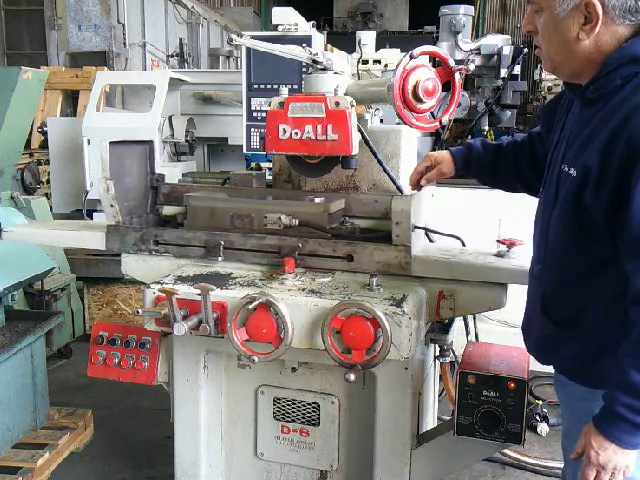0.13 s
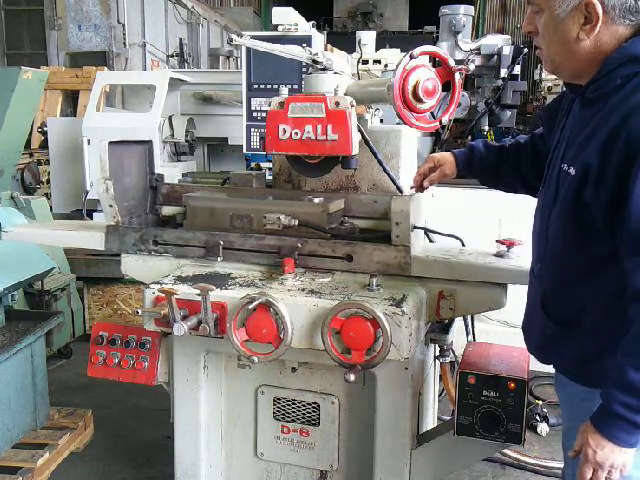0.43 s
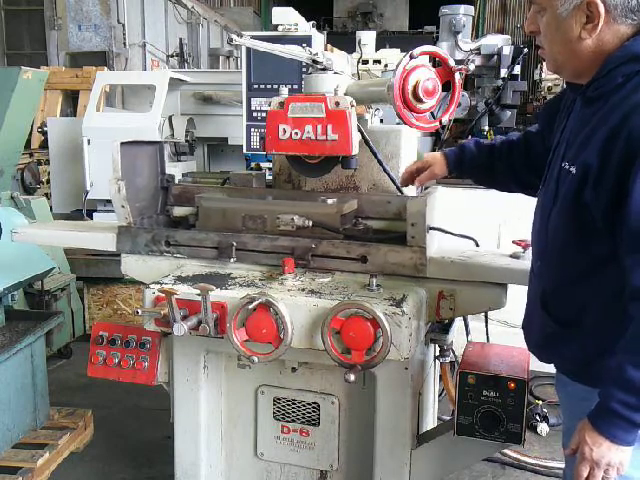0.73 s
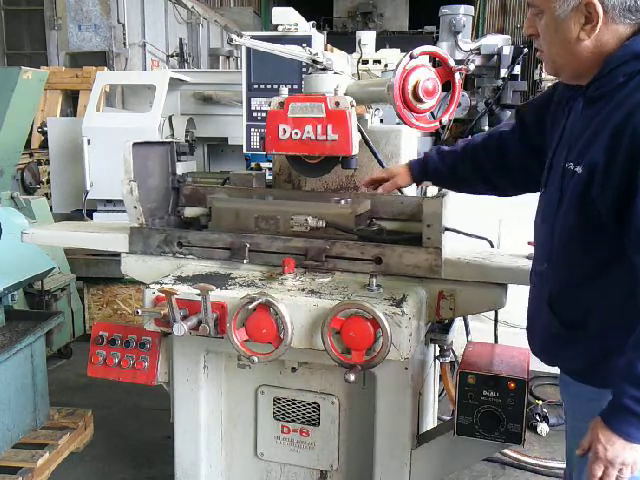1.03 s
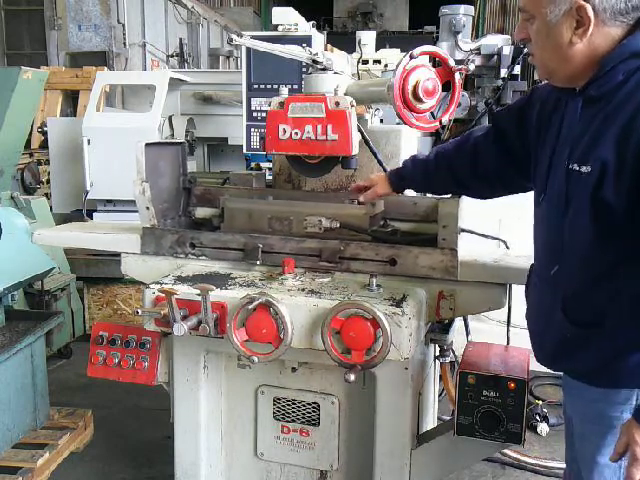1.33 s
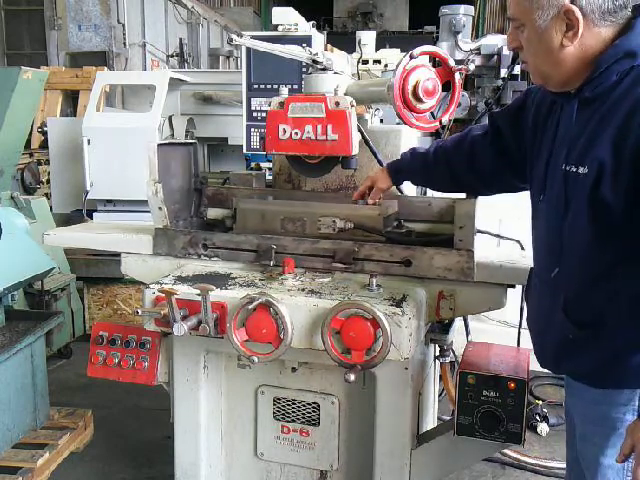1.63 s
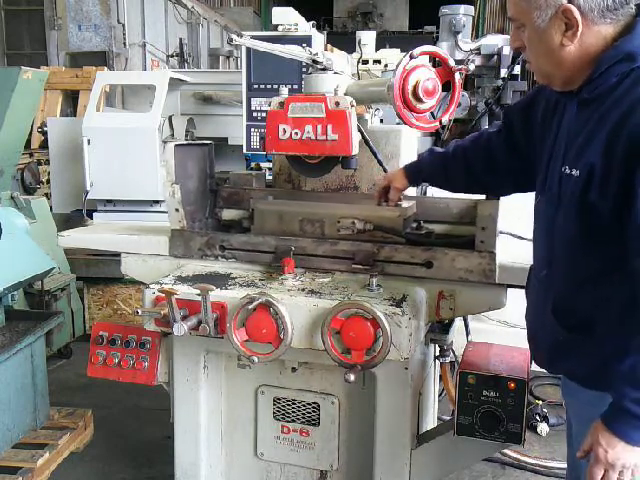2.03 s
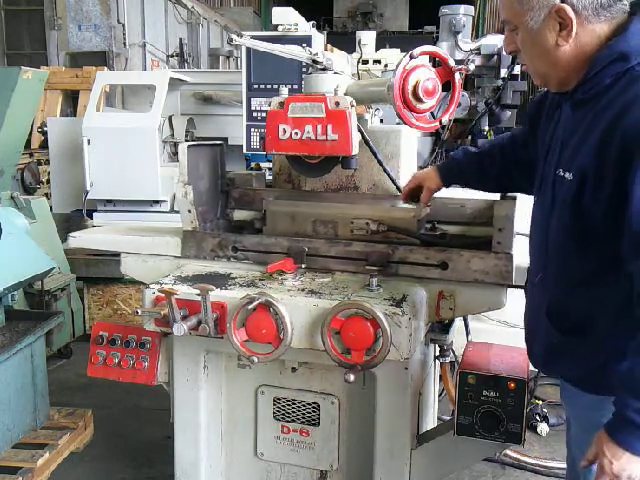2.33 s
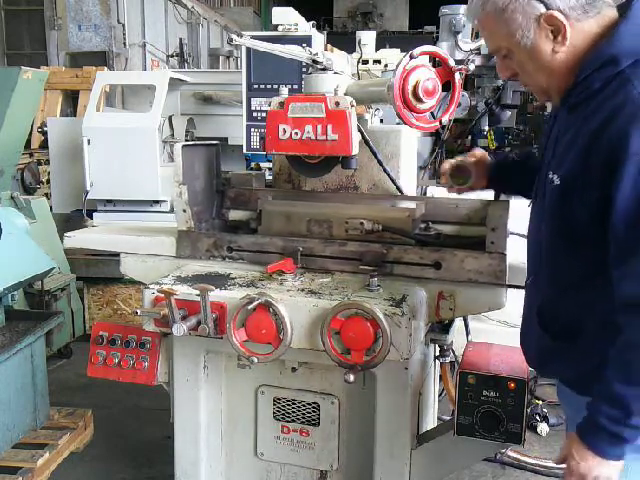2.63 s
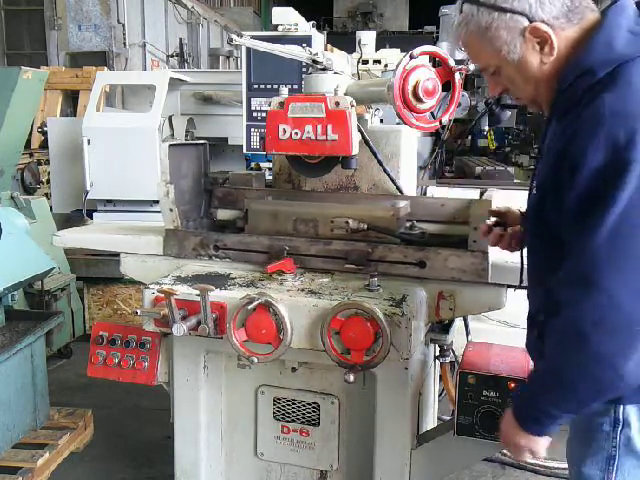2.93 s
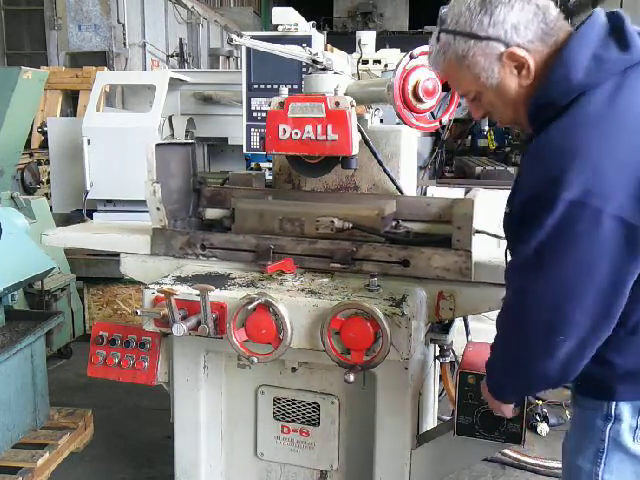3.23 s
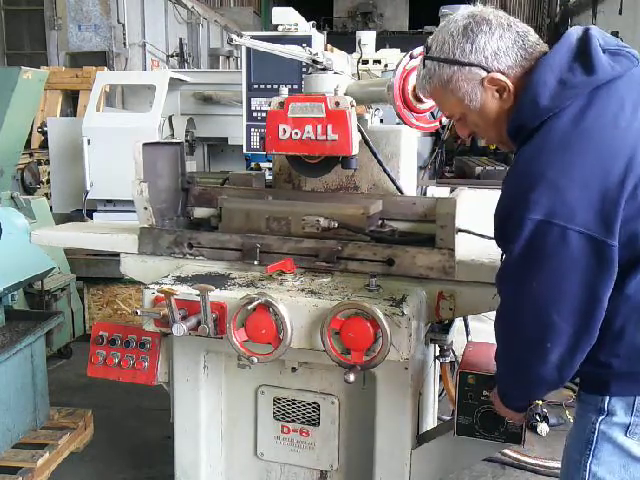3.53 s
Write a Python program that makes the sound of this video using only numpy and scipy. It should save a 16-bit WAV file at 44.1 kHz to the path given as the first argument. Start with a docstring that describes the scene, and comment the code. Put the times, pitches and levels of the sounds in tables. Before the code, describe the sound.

A hydraulic pump and motor drone evenly in a large workshop, picked up in mono by a small microphone. A click comes early, low knocks follow, then steel clacks with a faint scrape, and a last sharp click.

```python
"""A surface grinder idles in a large workshop, heard in mono through a small microphone.
From the start a nine-vane hydraulic pump hums and throbs once per shaft turn (sines locked to the
shaft) over motor tones (wavering sines), rumble and oil hiss (shaped noise). Table bumps are swells of noise.
Valve and latch clicks come and go from 0.35 s on: noise cracks with ringing steel. Low knocks come near 1.8 s.
From about 2.05 s clacks, short steel rings and a soft scrape are heard; the last knocks come near 3.7 s."""
import sys
import numpy as np
from scipy import signal
from scipy.fft import rfft, irfft
from scipy.io import wavfile
from scipy.ndimage import uniform_filter1d

SR = 44100
rng = np.random.default_rng(int(sys.argv[2]) if len(sys.argv) > 2 else 0)


def log_audio(samples):
    """Write samples as a 16-bit WAV file to the path given in sys.argv[1]."""
    # one column per channel
    frames = np.atleast_2d(samples).T
    # limit to full scale, then quantise
    limited = np.clip(frames, -1, 1)
    pcm = np.round(limited * 32767).astype(np.int16)
    wavfile.write(sys.argv[1], SR, pcm)


N = 163170  # length in samples


def gain_of(db):
    """Turn decibels into a plain multiplier."""
    return 10 ** (np.asarray(db) / 20)


def evened(x):
    """Scale a signal to an rms of 1."""
    return x / np.sqrt(np.mean(x ** 2) + 1e-20)


def read(points, hz):
    """Read a curve of (hz, value) points along a logarithmic pitch scale."""
    point_hz, value = np.transpose(points)
    return np.interp(np.log(hz + 1), np.log(point_hz + 1), value)


def add(mix, start_s, sound):
    """Add a sound into the mix at its start time, cut at the end of the mix."""
    part = mix[round(start_s * SR):][:len(sound)]
    part += sound[:len(part)]


def wander(rate_hz):
    """Slow random curve of rms 1: twelve sines up to rate_hz, the slow ones strongest."""
    t = np.arange(0, N + 256, 256) / SR
    curve = 0
    for hz in np.geomspace(rate_hz / 20, rate_hz, 12):
        curve = curve + np.sin(2 * np.pi * (hz * t + rng.random())) / np.sqrt(hz)
    return np.interp(np.arange(N) / SR, t, evened(curve))


def ringing(modes, t, pitch=1):
    """Struck steel: a sum of sines, each dying at its own speed."""
    out = 0
    for hz, level_db, t60_s in modes:
        out = out + gain_of(level_db - 60 * t / t60_s) * np.sin(2 * np.pi * hz * pitch * t)
    return out


def crack(colour, noise, pitch=1):
    """Rough contact: noise of rms 1 in a given colour, which pitch moves up or down."""
    hz = np.fft.rfftfreq(len(noise), 1 / SR)
    return evened(irfft(rfft(noise) * gain_of(read(colour, hz / pitch))))


# how long each band of the workshop echo takes to fall 60 dB: pitch_hz, t60_s
ECHO_TIMES = [(300, 0.97), (2000, 0.97), (8000, 0.25)]


def room(x):
    """Workshop echo: sparse taps of random sign, each band dying at its own speed."""
    taps = np.zeros(SR)
    at = np.arange(260, SR - 20, 20)  # samples; one tap in each step of 20
    taps[at + rng.integers(0, 20, len(at))] = rng.choice([-1., 1.], len(at))
    hz, t, bands = signal.stft(taps, SR, nperseg=256)
    fading = bands * gain_of(-60 * t / read(ECHO_TIMES, hz)[:, None])
    tail = signal.istft(fading, SR, nperseg=256)[1]
    return signal.fftconvolve(x, tail / np.linalg.norm(tail))[:N]


# colour of the rumble and hiss, only the shape counts: pitch_hz, relative_db_per_hz
FLOOR_COLOUR = [(25, -75.5), (60, -70.5), (72, -65.5), (90, -70), (110, -57.5), (200, -60), (300, -57.5),
                (400, -62.5), (520, -53.5), (650, -60.5), (900, -61.5), (1150, -69), (1550, -65.5),
                (1900, -68), (2100, -77), (3000, -76), (5000, -85), (6000, -83.5), (7400, -71), (8300, -82),
                (9100, -103.5)]


def rumble_and_hiss():
    """Rumble and oil hiss: random spectra with drifting louder and softer patches."""
    level_db, level_waver_db, patch_db = -42.5, 0.24, 1.2
    frames, hz = N // 256 + 5, np.fft.rfftfreq(1024, 1 / SR)
    real, imaginary, patches = rng.standard_normal((frames, 513, 3)).T
    patches = uniform_filter1d(patches, 14, 0)  # smooth across pitch
    patches = evened(uniform_filter1d(patches, 10, 1))  # smooth along time
    colour_db = read(FLOOR_COLOUR, hz)[:, None] + patch_db * patches
    spectra = (real + 1j * imaginary) * gain_of(colour_db)
    noise = signal.istft(spectra, nperseg=1024, noverlap=768)[1][:N]
    return gain_of(level_db + level_waver_db * wander(30)) * evened(noise)


# steady tones of the wheel motor: pitch_hz, level_db (rms)
MOTOR_TONES = [(105, -60.5), (840, -67.5), (1136, -61), (2530, -68), (2649, -71)]
# level of the strongest motor tone over time: time_s, level_db (rms)
WHINE_LEVEL = [(0, -54), (1.3, -57), (1.8, -49), (2.7, -52), (3.1, -57), (3.7, -53)]


def motor():
    """Wheel motor: slightly wavering sines; the strongest swells slowly."""
    t = np.arange(N) / SR
    whine_hz = 714.4
    whine_gain = gain_of(np.interp(t, *np.transpose(WHINE_LEVEL)))
    out = whine_gain * np.sin(2 * np.pi * whine_hz * t + 0.31 * wander(4))  # phase waver in rad
    for hz, level_db in MOTOR_TONES:
        gain = gain_of(level_db + 0.82 * wander(7.2))  # level waver in dB
        out += gain * np.sin(2 * np.pi * hz * t + 0.54 * wander(7))
    return np.sqrt(2) * out  # makes the levels rms


# dull bumps of the table and a soft scrape:
# start_s, level_db (rms before the fades), pitch_hz, width_octaves, length_s
TABLE_BUMPS = [(.08, -47, 150, 0.8, 0.16), (2.155, -46.5, 7330, 0.16, .08), (2.255, -46.5, 180, 1.3, .2),
               (2.268, -42.5, 870, .4, 0.21)]


def bumps():
    """Table bumps and a scrape: short swells of noise kept to one band."""
    out = np.zeros(N)
    noises = rng.standard_normal((len(TABLE_BUMPS), 16384))
    for (start_s, level_db, hz, octaves, length_s), noise in zip(TABLE_BUMPS, noises):
        edges_hz = hz * 2 ** (octaves * np.array([-.5, .5]))
        band_filter = signal.butter(2, edges_hz, "band", fs=SR, output="sos")
        band = signal.sosfilt(band_filter, noise)[-round(length_s * SR):]
        add(out, start_s, gain_of(level_db) * evened(band) * np.hanning(len(band)) ** .5)
    return out


# thin steel rings, stopped by a finger: start_s, length_s (before the fade-out), pitch_hz, level_db (peak)
STEEL_RINGS = [(2.052, .062, 6089, -45.5), (2.2515, 0.0058, 6840, -21), (2.285, 0.041, 6840, -51)]


def rings():
    """Thin steel: steady sines that start fast and stop short."""
    rise_s, fade_s = 0.0012, 0.0056
    t, out = np.arange(8192) / SR, np.zeros(N)
    for start_s, length_s, hz, level_db in STEEL_RINGS:
        shape = np.clip(np.minimum(t / rise_s, (length_s - t) / fade_s + 1), 0, 1)
        add(out, start_s, gain_of(level_db) * shape * np.sin(2 * np.pi * hz * t))
    return out


# knocks of the table, the valve lever and the steel part on the chuck:
# start_s, relative_level_db, pitch_factor
KNOCKS = [(1.765, -24.5, .34), (1.79, -27, .3), (1.835, -28, .28), (.352, -37, 1.9), (1.386, -36, 1.82),
          (2.352, -33, 1.7), (3.405, -37, 1.6), (2.362, -30, 1.0), (2.047, -21.5, 1.68), (2.068, -39, 1.6),
          (2.116, -36.5, 1.6), (2.261, -19.5, 1.01), (2.278, -23, .95), (2.371, -28.5, 1.04),
          (3.691, -29, 3.55)]
# ringing tones of a knock at pitch factor 1: pitch_hz, relative_level_db, t60_s (time to fall 60 dB)
KNOCK_MODES = [(784, -12, 0.063), (859, -6, 0.13), (948, 3, .08), (1160, -13, 0.028)]
# colour of the knock noise at pitch factor 1: pitch_hz, relative_level_db
KNOCK_COLOUR = [(400, -34), (700, -17.5), (820, -2.5), (950, 1.5), (1300, -12), (1800, -10), (2600, -16),
                (4000, -21), (8000, -33)]


def clacks():
    """Rough knocks: dying coloured noise with a few ringing tones, moved together in pitch."""
    noise_db, noise_t60_s, rise_s = 3.5, 0.071, .005  # a higher pitch rises faster
    t, out = np.arange(8192) / SR, np.zeros(N)
    noises = rng.standard_normal((len(KNOCKS), 8192))
    for (start_s, level_db, pitch), noise in zip(KNOCKS, noises):
        burst = crack(KNOCK_COLOUR, noise, pitch) * gain_of(noise_db - 60 * t / noise_t60_s)
        rise = np.minimum(t * pitch / rise_s, 1)
        # 8 dB down, since noise and tones add up
        add(out, start_s, gain_of(level_db - 8) * rise * (burst + ringing(KNOCK_MODES, t, pitch)))
    return out


# valve and latch clicks: start_s, relative_level_db, rise_s
VALVE_CLICKS = [(.350, -14.5, 0.0029), (.364, -32, 0.0038), (0.376, -40, 0.0033), (1.384, -29.5, 0.0087),
                (2.048, -29.5, 0.0025), (2.26, -21, .004), (2.351, -17.5, 0.0022), (2.371, -29, 0.003),
                (3.402, -29, .01), (3.691, -20, .0012), (3.694, -30, 0.001)]
# colour of the click noise: pitch_hz, relative_level_db
CLICK_NOISE_COLOUR = [(500, -33.5), (1300, -27), (1750, -14), (2300, -17.5), (3000, -29), (4000, -14),
                      (5000, -14), (6000, -9.5), (7200, 2.5), (8500, -15)]
# short steel tones in a click: pitch_hz, relative_level_db, t60_s (time to fall 60 dB)
CLICK_STEEL = [(1788, -9, .06), (3382, -15, 0.017), (6640, -6, 0.044), (7620, -4, .05), (7500, -13, .08)]


def clicks():
    """Valve and latch: a bright crack of dying noise with short steel tones."""
    noise_db, noise_t60_s = 2, 0.035
    t, out = np.arange(4096) / SR, np.zeros(N)
    noises = rng.standard_normal((len(VALVE_CLICKS), 4096))
    for (start_s, level_db, rise_s), noise in zip(VALVE_CLICKS, noises):
        burst = crack(CLICK_NOISE_COLOUR, noise) * gain_of(noise_db - 60 * t / noise_t60_s)
        rise = np.minimum(t / rise_s, 1)
        # 5.5 dB down, since noise and tones add up
        add(out, start_s, gain_of(level_db - 5.5) * rise * (burst + ringing(CLICK_STEEL, t)))
    return out


# pump shaft speed, which races briefly while the valve unloads: time_s, turns_per_s
SHAFT_SPEED = [(0, 28.435), (.25, 28.435), (.3, 28.415), (.45, 28.42), (.55, 28.428), (2.2, 28.428),
               (2.31, 28.53), (2.42, 28.43), (2.7, 28.42), (3.7, 28.415)]
# pump levels over time: time_s, main_hum_db (rms), overtones_db, high_overtones_db
HUM_LEVELS = [(0.0, -25, -46, -67), (0.22, -26, -48, -62.5), (0.4, -24, -45.5, -64.5),
              (0.6, -24.5, -46.5, -65), (1.1, -24, -47, -63.5), (1.81, -25.5, -47, -63.5),
              (2.02, -27, -47.5, -61.5), (2.06, -27, -48, -56), (2.1, -26.5, -47, -65),
              (2.28, -27, -48, -58), (2.31, -24.5, -52, -63), (2.41, -29.5, -47.5, -63),
              (2.48, -29, -46.5, -69), (2.51, -26, -46.5, -61.5), (2.64, -26, -46.5, -64.5),
              (3.53, -22, -45.5, -67.5), (3.68, -25.5, -45.5, -70), (3.7, -25, -48, -61)]
# overtones of the vane pulses: cycles_per_turn; and level_db against the overtone level
OVERTONE_ORDERS = [9, 27, 36, 45, 54, 63, 108, 117, 126]
OVERTONE_DB = [-18.5, 2.5, 3.5, -3, 3, -14.5, -21, -20.5, -24.5]
# high overtones: cycles_per_turn; and level_db against the high overtone level
HIGH_OVERTONE_ORDERS = [72, 81, 90, 99]
HIGH_OVERTONE_DB = [5, -1, -16.5, -2.5]
# once-a-turn knock through the housing: cycles_per_turn; and level_db (rms)
TURN_ORDERS = [8, 15, 16, 17, 19, 20, 21, 23, 25, 26, 34, 37, 46, 55, 62]
TURN_DB = [-62, -65, -48, -52.5, -35.5, -38.5, -67.5, -66, -63, -57.5, -56, -56.5, -63.5, -60, -59]


def pump():
    """Vane tones and a once-a-turn knock, all locked to the shaft, so that the hum throbs."""
    hum_angle, overtone_angle, knock_angle = -.075, -.319, 1.079  # shaft angles, rad
    overtone_lead, low_lead = 2.4, 1.3  # phase leads, rad; low_lead is for orders below housing resonances
    level_waver_db = 0.63
    t = np.arange(N) / SR
    speed = np.interp(t, *np.transpose(SHAFT_SPEED))
    angle = 2 * np.pi * np.cumsum(speed) / SR
    time_s, *levels = np.transpose(HUM_LEVELS)
    hum, over, high = (gain_of(np.interp(t, time_s, db)) for db in levels)

    def orders(cycles_per_turn, levels_db, start_angle, lead):
        """Tones that repeat a whole number of times per turn, each wavering in level."""
        total = 0
        for k, level_db in zip(cycles_per_turn, levels_db):
            gain = gain_of(level_db + level_waver_db * wander(4.7))
            total = total + gain * np.cos(k * (angle - start_angle) + lead(k))
        return total

    out = hum * np.cos(18 * (angle - hum_angle))  # two cycles per vane
    out += over * orders(OVERTONE_ORDERS, OVERTONE_DB, overtone_angle,
                         lambda k: overtone_lead + low_lead * (k < 36))
    out += high * orders(HIGH_OVERTONE_ORDERS, HIGH_OVERTONE_DB, overtone_angle, lambda k: overtone_lead)
    out += orders(TURN_ORDERS, TURN_DB, knock_angle, lambda k: low_lead * (k < 18))
    return np.sqrt(2) * out  # makes the levels rms


def scene():
    """Steady machine plus its hits and soft sounds, which also echo in the workshop."""
    echo_db, soft_echo_db = -10, -12.5  # soft sounds enter the echo weaker by soft_echo_db
    hits = clicks() + clacks()
    soft = rings() + bumps()
    machine = rumble_and_hiss() + motor() + pump()
    echo = gain_of(echo_db) * room(hits + gain_of(soft_echo_db) * soft)
    return (machine + hits + soft + echo)[None]


def record(dry):
    """Small microphone: a low-pass filter takes away the pitches above its band limit."""
    band_limit_hz = 8850
    low_pass = signal.firwin(201, band_limit_hz, window=("kaiser", 9), fs=SR)
    return signal.oaconvolve(dry, low_pass[None], "same")


dry = scene()
out = record(dry)
log_audio(out)
```